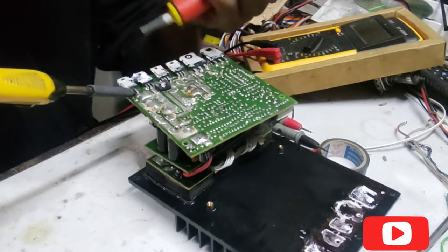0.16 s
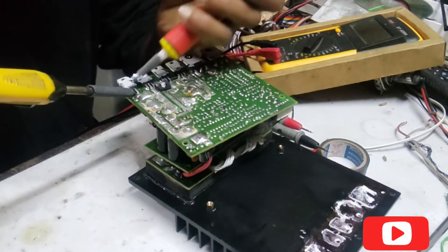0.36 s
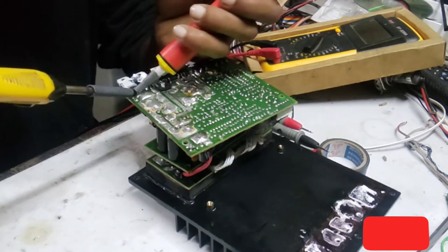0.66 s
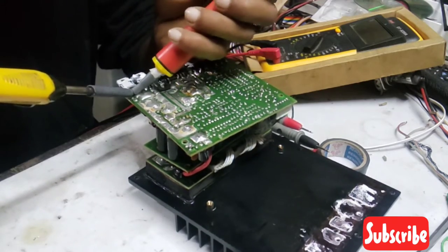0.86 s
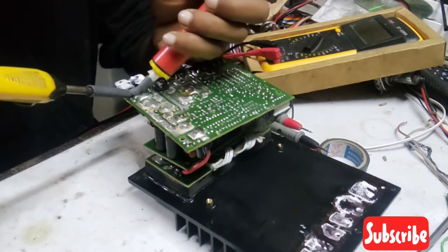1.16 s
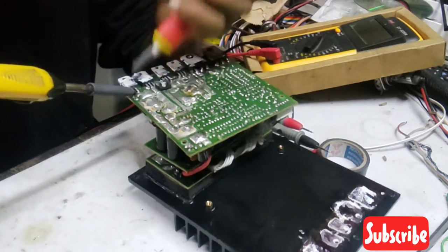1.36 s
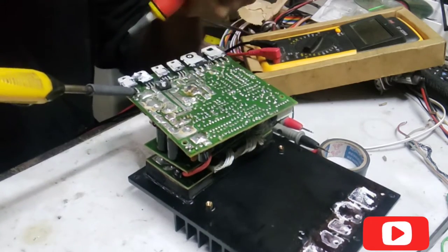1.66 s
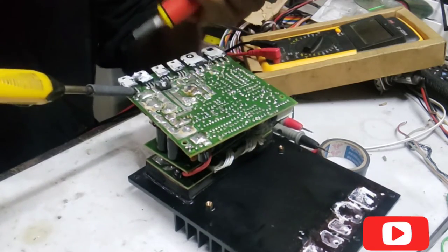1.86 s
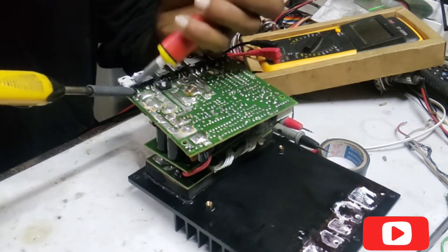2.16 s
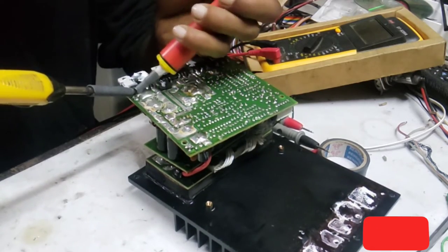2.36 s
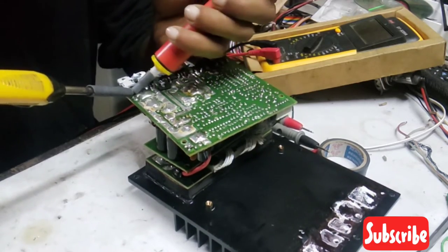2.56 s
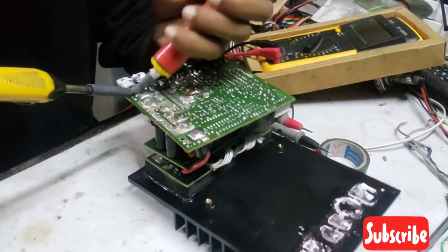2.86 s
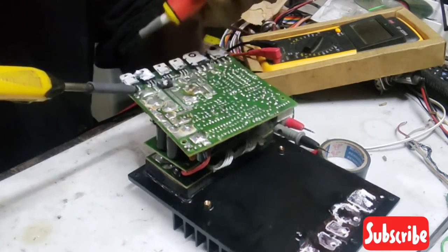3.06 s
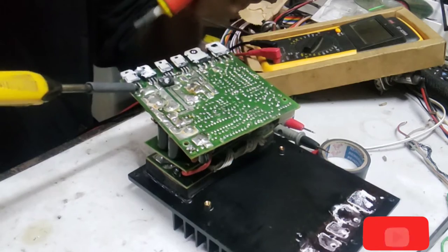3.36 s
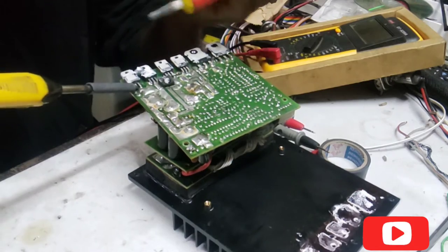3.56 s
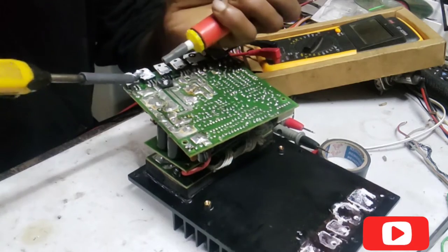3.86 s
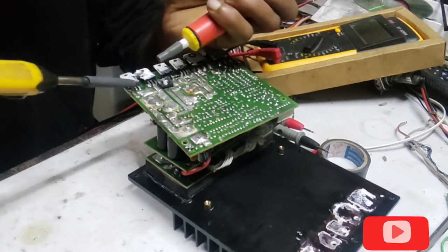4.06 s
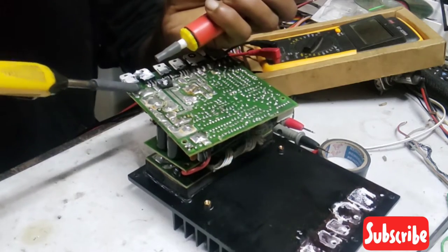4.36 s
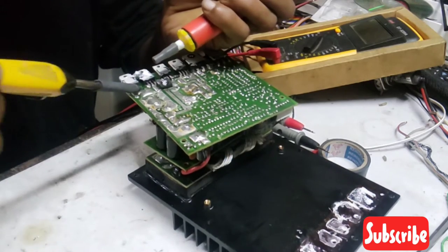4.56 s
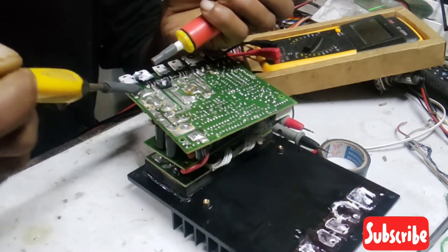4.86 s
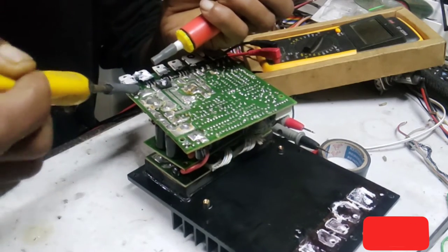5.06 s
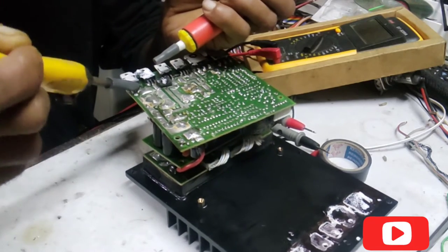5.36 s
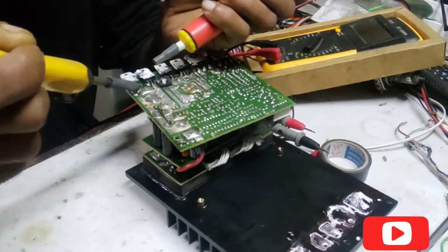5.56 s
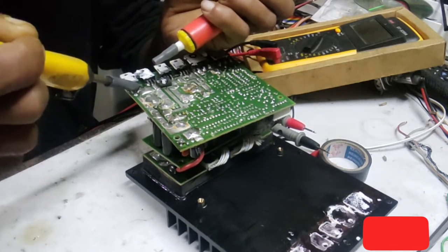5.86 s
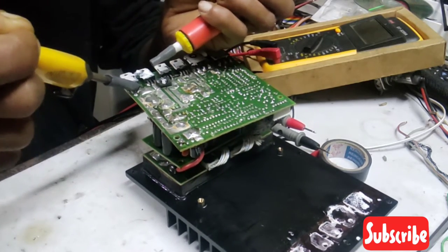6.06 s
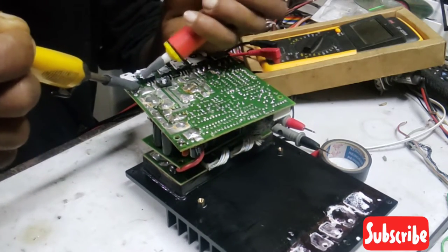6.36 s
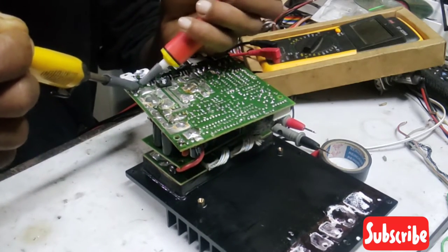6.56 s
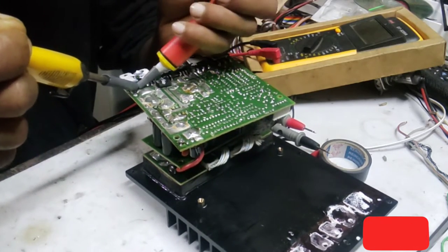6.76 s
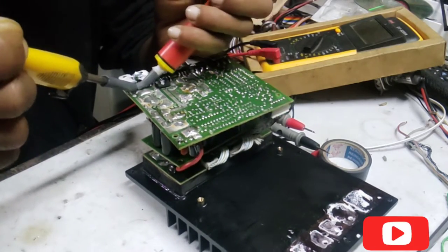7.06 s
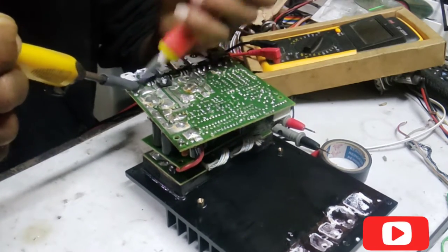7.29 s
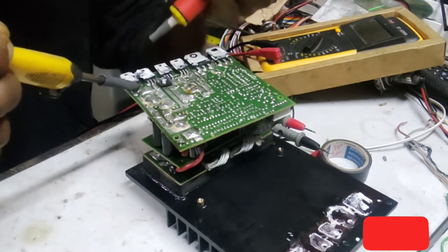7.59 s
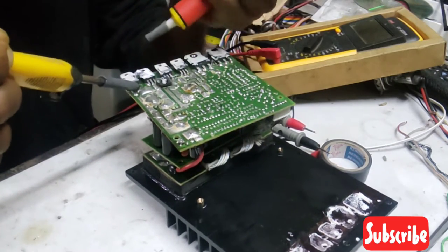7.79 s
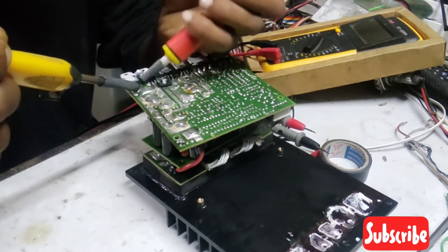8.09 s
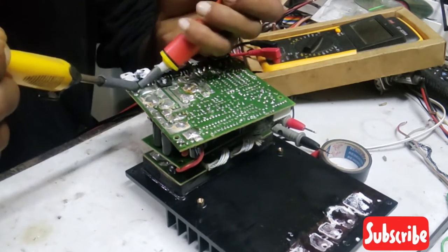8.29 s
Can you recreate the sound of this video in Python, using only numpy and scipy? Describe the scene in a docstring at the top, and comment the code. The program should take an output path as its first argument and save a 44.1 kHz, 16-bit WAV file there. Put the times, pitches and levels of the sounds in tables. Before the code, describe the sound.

A spring-loaded solder pump snaps repeatedly beside a circuit board. Each cycle begins with a hard bright latch click, then small taps; releases bring a short rush of air, a woody thud and a high ringing metal strike with spring chatter. Busy tool taps and a faint rub fill the middle. Heard very near on a phone, with a short small-room echo and a low hiss and hum.

```python
"""A steady hiss over mains hum comes first; then a spring solder pump works on a circuit board, close to a phone.
The latch clicks (a burst of noise with one sharp click) and the thumb lets the plunger settle. Tools tap, tick
and rub the board (shaped noise), which thuds (short low sines). On release air rushes in (noise that swells and
fades) and the piston clangs the metal barrel (ringing sines, spring chatter). A small room answers with an echo."""
import sys
import numpy as np
from scipy import signal
from scipy.fft import rfft, irfft, next_fast_len
from scipy.io import wavfile
from scipy.ndimage import uniform_filter1d

SR = 44100
rng = np.random.default_rng(int(sys.argv[2]) if len(sys.argv) > 2 else 0)


def generate_wav(signal):
    """Clip the signal to [-1, 1] and save it as 16-bit WAV at the path in sys.argv[1]."""
    frames = np.transpose(np.atleast_2d(signal))
    scaled = np.clip(frames, -1, 1) * 32767
    pcm = np.round(scaled).astype(np.int16)
    wavfile.write(sys.argv[1], SR, pcm)


N = 371763  # length of the scene in samples

# Colours give the balance of low and high tones; noise() and click() then set the overall level.
# steady hiss, its colour: pitch_hz, level_db (per Hz)
HISS_COLOUR = [(25, -50), (87, -12), (190, -11), (400, -14.5), (600, -18.5), (1330, -22), (2200, -22.5),
               (2800, -19.5), (3600, -26.5), (6050, -30.5), (9500, -42.5), (11500, -30.5), (13500, -30.5),
               (16000, -34)]
HISS_DB = -58.5
# mains harmonics: pitch_hz, level_db (peak of the sine)
HUM_TONES = [(199.2, -69), (398.4, -62.5), (597.5, -75)]
# how alike left and right are, for spread-out sounds: pitch_hz, likeness (0-1)
FAR_LIKENESS = [(100, 0.22), (400, 0.29), (800, 0), (2500, 0.05), (8000, 0), (11000, 0)]
# how alike left and right are, for contacts, rumble and echo: pitch_hz, likeness (0-1)
NEAR_LIKENESS = [(300, 0.85), (700, 0.5), (1500, 0.07), (12000, 0.3)]
# the latch clicks as the plunger is cocked: start_s, level_db
LATCH_CLICKS = [(0.0438, -11), (1.794, -11.5), (3.3908, -10.5), (7.8194, -13)]
# colour of the latch: pitch_hz, level_db (per Hz)
LATCH_COLOUR = [(350, -53.5), (600, -15), (957, -27.5), (1130, -28.5), (1570, -14.5), (1980, -17),
                (2990, 1), (3500, 6), (4980, 0.5), (6920, -12.5), (11800, -1.5), (14900, -1), (16000, -39)]
LATCH_THUD_DB, LATCH_THUD_HZ = -27.5, 160  # thud level is relative to the click
# low modes (natural tones) of board and bench: pitch_hz, level_db, ring_s (time to fall 60 dB)
BOARD_MODES = [(111.3, -8.5, 0.064), (143.7, -5, 0.17), (189.4, -1.5, 0.12), (235.6, -3.5, 0.087),
               (292.4, 0, 0.079), (342, -2.5, 0.056), (473, -1, 0.085), (593, -18.5, 0.2),
               (900, -17, 0.049)]
# a moment later the thumb lets the plunger settle: start_s, level_db
SETTLES = [(0.141, -31.5), (1.907, -33), (3.51, -32.5), (7.931, -36)]
# colour of the settling: pitch_hz, level_db (per Hz)
SETTLE_COLOUR = [(290, -16.5), (500, 1), (1060, -15), (1980, -8.5), (2850, -21), (3980, -13), (4600, -16),
                 (5470, -16.5), (8700, -20.5), (12100, -4.5), (16000, -34.5)]
SETTLE_THUD_DB, SETTLE_THUD_HZ = -8.5, 536  # thud level is relative to the contact
# tools tap the board: start_s, crack_db, thud_db, thud_centre_hz, knock_hz
TAPS = [(0.1506, -46.5, -59, 258, 2600), (1.1459, -48.5, -39, 146, 1110), (1.2773, -55, -47, 423, 1590),
        (1.293, -45, -30.5, 139, 2200), (1.4552, -50, -39, 182, 1590), (1.5214, -47.5, -44, 195, 4730),
        (1.621, -43, -58, 394, 5470), (2.7683, -47.5, -43, 167, 3900), (2.7846, -40.5, -61, 121, 2070),
        (2.8884, -58, -33, 124, 1580), (2.9068, -38, -30.5, 164, 4980), (3.243, -40.5, -62, 201, 1590),
        (3.706, -43.5, -33, 131, 2850), (4.339, -57, -35.5, 245, 1010), (4.3864, -49.5, -45.5, 188, 980),
        (4.6015, -45, -46, 506, 2010), (4.6419, -35.5, -33, 475, 2050), (4.7769, -49, -41, 368, 1950),
        (4.8208, -42, -38.5, 252, 2310), (4.8922, -49.5, -33, 172, 790), (4.9855, -52, -44, 157, 2120),
        (5.155, -61.5, -41.5, 212, 2480), (5.215, -60, -43, 239, 2800), (5.678, -64, -46, 370, 845),
        (5.9397, -52, -47, 482, 2090), (6.8962, -46.5, -33.5, 305, 944), (6.9059, -49.5, -33, 320, 2140),
        (7.106, -35.5, -36.5, 134, 2180), (7.262, -50.5, -39, 142, 1670), (7.2776, -45, -49, 199, 2100),
        (7.234, -57, -44.5, 250, 2800), (7.6549, -46, -48, 144, 2860), (7.6907, -46, -47, 203, 1130)]
# colour of taps and strikes: pitch_hz, level_db (per Hz)
TAP_COLOUR = [(300, -22.5), (600, -5), (1000, -7), (2200, -6), (4000, -10), (5500, -4), (8000, -11),
              (12000, -9), (15300, -16), (16000, -23.5)]
TAP_TREBLE_DB = -10.5
# faint bright ticks with no thud: start_s, level_db
TICKS = [(0.2965, -50.5), (0.3502, -55.5), (0.411, -52), (0.5167, -51.5), (0.5378, -52), (5.392, -57),
         (7.9866, -47), (8.0724, -54.5), (8.322, -54.5)]
TICK_TREBLE_DB, TICK_KNOCK_HZ = 5.5, 2770
# the plunger is let go and air rushes in: start_s, crack_db, thud_db, thud_centre_hz,
# air_swell_s, air_peak_db, air_hold_db, air_hold_s
RELEASES = [(1.063, -33.5, -24, 496, 0.019, -25.5, -51.5, 0.085),
            (2.697, -32.5, -26.5, 115.4, 0.059, -34, -45.5, 0.058),
            (7.0487, -31.5, -22.5, 123, 0.058, -28, -44, 0.049)]
# colour of the rushing air: pitch_hz, level_db (per Hz)
AIR_COLOUR = [(410, -1), (700, 0.5), (798, -4), (1600, -7.5), (1800, -35.5), (2020, -5.5), (3500, -2.5),
              (8990, -11.5), (14600, -2), (16000, -9.5)]
RELEASE_TREBLE_DB, RELEASE_KNOCK_HZ = 0.5, 3910
AIR_LAG_S, AIR_DROP_S, AIR_FADE_S = .004, 0.01, 0.015
AIR_SWELL_DB, AIR_FADE_DB = 51.5, 27.5  # how far the air climbs to its peak, and falls at the end
# piston and spring strike the metal: start_s, crack_db, thud_db, thud_centre_hz, hardness_db (as treble),
# knock_hz, barrel_ring_db, rod_ring_db, tip_ring_db, ring_length (0-1, shortens the ring)
CLANGS = [(1.3175, -23.5, -23, 126, -1, 3370, -17, -25, -54, 0.46),
          (1.3723, -36, -37, 210, -1, 2900, -34, -47, -28, 1),
          (1.476, -40, -38, 190, -4.5, 1590, -45, -42.5, -65, 1),
          (2.9161, -20, -26.5, 190, -2, 1850, -20.5, -19, -52, 0.98),
          (2.9978, -19.5, -30, 190, 2, 4400, -12.5, -13.5, -33, 0.87),
          (3.0814, -35, -36.5, 151, -21, 2590, -25.5, -24, -26.5, 0.17),
          (3.1357, -37, -56, 156, 3, 4270, -34.5, -30, -64, 0.35),
          (3.1888, -30, -63, 584, 4, 3800, -50, -45, -47, 1),
          (3.7401, -30.5, -34, 185, -10.5, 3480, -17.5, -22, -18, 1),
          (7.2815, -18, -9.5, 200, -0.5, 2060, -26, -17.5, -55, 0.59),
          (7.4076, -38, -49, 113, -5, 2300, -48, -44, -71, 0.9)]
# modes of the struck metal: pitch_hz
METAL_HZ = [4910, 5012, 5084, 5405, 5657, 6378, 6593, 6652, 7985, 9786, 9847, 10600, 12056, 12113, 14845]
# the same modes: level_db, ring_s (time to fall 60 dB at full ring_length)
METAL_MODES = [(-12, 0.5), (-17, 0.2636), (-10.5, 0.64), (-11, 0.073), (-7, 0.34), (-7.5, 0.11),
               (-18, 0.46), (-13.5, 0.57), (-27, 0.67), (-24.5, 0.58), (-28, 0.62), (2.5, 0.098), (-29, 1),
               (-11.5, 0.33), (-2, 0.053)]
# the same modes: which part rings (barrel 0, rod 1, tip 2)
METAL_PART = [0, 0, 1, 0, 0, 1, 1, 1, 0, 0, 0, 2, 1, 1, 0]
# the hand closes on the barrel: start_s
GRIP_S = [1.62, 3.19, 4.2, 7.41]
# a harder strike also reaches the high modes: dB per octave above the knee, for each dB of hardness
REACH_PER_OCTAVE, REACH_KNEE_HZ = 4.3, 7660
# colour of the spring's chatter: pitch_hz, level_db (per Hz)
RATTLE_COLOUR = [(500, -6.5), (1000, -12.0), (3000, -4.0), (5000, -5.0), (8000, -17.5)]
RATTLE_DB = -10  # relative to the crack
# the iron rubs along the board: start_s, level_db, rumble_db
RUBS = [(4.4, -65, -62), (4.55, -49, -60.5), (4.668, -52.5, -43), (4.78, -62.5, -64)]
# colour of the rub: pitch_hz, level_db (per Hz)
RUB_COLOUR = [(350, -17), (600, 1.5), (1070, -12), (1310, 0.5), (1550, -7), (2090, 0.5), (2500, -5),
              (3590, -2.5), (4990, -17), (9000, -22.5), (11700, -28), (19800, -120)]
# colour of the shaken board: pitch_hz, level_db (per Hz)
RUMBLE_COLOUR = [(40, -46), (90, -17), (200, 1), (450, 3.5), (800, -10.5), (1600, -32)]
# how long the room rings: pitch_hz, ring_s (time to fall 60 dB)
ROOM_T60 = [(200, 0.32), (1000, 0.18), (4000, 0.16), (12000, .16)]
ROOM_DB = -6
# the phone's two microphone ports: pitch_hz, left_minus_right_db
PORT_DB = [(200, 1), (1500, 0), (4000, -0.5), (8000, -2.5), (12000, 12), (15000, 0.5)]
PORT_LAG_S = .00007  # the right port hears the bench this much later
TOP_HZ = 15700  # the phone passes little above this


def undb(db):
    """Turn a level in dB into a gain."""
    return 10 ** (np.asarray(db) / 20)


def along(table, hz):
    """Read between the (pitch, value) points of a table, on a log-frequency axis."""
    f, v = np.transpose(table)
    return np.interp(np.log(np.maximum(hz, 1)), np.log(f), v)


def curve(table):
    """Turn a table's dB columns into gains along time, silent outside the table."""
    s, *columns = np.transpose(table)
    t = np.arange(N) / SR
    return [undb(np.interp(t, s, column, -200, -200)) for column in columns]


def add(out, x, s):
    """Mix a sound in at s seconds."""
    i = int(s * SR)
    out[:, i:i + x.shape[1]] += x[:, :N - i]


def noise(colour, likeness, size):
    """Two channels of coloured noise, rms 1; part is shared, part is each channel's own."""
    n = next_fast_len(size)
    hz = np.fft.rfftfreq(n, 1 / SR)
    alike = np.clip(along(likeness, hz), 0, 1)
    mid, side = rfft(rng.standard_normal((2, n))) * np.sqrt([1 + alike, 1 - alike])
    left_right = mid + side * np.array([[1], [-1]])
    x = irfft(left_right * undb(along(colour, hz)), n)[:, :size]
    return x / x.std()


def flutter(shape, hold):
    """Random levels held for `hold` samples, with smooth slides between them; spread near 1."""
    rows, size = shape
    steps = np.repeat(rng.standard_normal((rows, size // hold + 1)), hold, axis=1)
    return 1.2 * uniform_filter1d(steps, size=hold)[:, :size]


def click(colour, size):
    """One sharp click, peak 1: a spectrum with its energy packed at the start (minimum phase)."""
    log_spectrum = np.log(undb(along(colour, np.fft.rfftfreq(size, 1 / SR))))
    cepstrum = irfft(log_spectrum, size)
    # fold the second half onto the first, so nothing sounds before the click
    cepstrum[1:size // 2] *= 2
    cepstrum[size // 2 + 1:] = 0
    x = irfft(np.exp(rfft(cepstrum)), size)
    return x / np.abs(x).max()


def crack(colour, rise_s, fall_s, click_db, treble_db=0, knock_hz=3500, knock_db=0):
    """A contact: a scrape swells to one sharp click and dies; a narrow knock colours both."""
    hz = np.geomspace(300, 16000, 80)
    knock = knock_db * np.exp(-(np.log2(hz / knock_hz) / 0.21) ** 2)
    db = along(colour, hz) + treble_db * (hz > 5000) + knock
    colour = list(zip(hz, db))
    lead = int(.006 * SR)  # samples before the click
    t = (np.arange(2048) - lead) / SR
    swell = np.exp(np.minimum(t / rise_s, -t / fall_s))
    scrape = noise(colour, NEAR_LIKENESS, len(t)) * swell
    snap = undb(click_db) * click(colour, len(t))
    return scrape + [np.roll(snap, lead), np.roll(snap, lead + int(PORT_LAG_S * SR))]


def ring(hz, db, t60, scatter_db, detune, rise_s, size, rough_db=1.7):
    """One blow on a body: sines swell and decay unevenly, each blow a little different."""
    chance, t = rng.standard_normal((2, len(hz), 1)), np.arange(size) / SR
    # loose parts touch the body as it rings, so each mode wavers
    db = db[:, None] + scatter_db * chance[0] + rough_db * flutter((len(hz), size), 400)
    gain = undb(db - 60 * t / t60[:, None]) * (1 - np.exp(-t / rise_s))
    turn = 2 * np.pi * hz[:, None] * (1 + detune * chance[1])
    # round the phone's body tones reach the far port late, by a quarter cycle at most
    late = np.minimum(turn * PORT_LAG_S, np.pi / 2)
    return np.array([(gain * np.sin(turn * t - lag)).sum(0) for lag in (0, late)])


def thud(db, centre_hz, rise_s, spread_db=7.0):
    """The board and bench ring low; the place struck favours the modes near centre_hz."""
    hz, mode_db, t60 = np.transpose(BOARD_MODES)
    # modes lose spread_db for each octave away from the centre
    favoured_db = db + mode_db - spread_db * np.abs(np.log2(hz / centre_hz))
    return ring(hz, favoured_db, t60, 2.3, 0.04, rise_s, size=9000)


def background():
    """Steady hiss, which is coloured noise, over mains hum, which is plain sines."""
    t = np.arange(N) / SR
    hum = sum(undb(db) * np.sin(2 * np.pi * hz * t) for hz, db in HUM_TONES)
    return undb(HISS_DB) * noise(HISS_COLOUR, FAR_LIKENESS, N) + hum


# The contact functions below start each crack 5 ms early, because its click comes 6 ms in.
def latch_clicks(pump, board):
    """The latch snaps as the plunger is cocked: a very short crack and a quick thud."""
    for s, db in LATCH_CLICKS:
        add(pump, undb(db) * crack(LATCH_COLOUR, .0011, .0013, 12.), s - .005)
        add(board, thud(db + LATCH_THUD_DB, LATCH_THUD_HZ, 0.00082), s)


def room():
    """Echo of a small room for each port: noise that dies at its own speed in each octave band."""
    t, out = np.arange(int(.3 * SR)) / SR, 0
    for hz in 125 * 2. ** np.arange(8):
        edges = [hz / 2 ** .5, min(hz * 2 ** .5, .45 * SR)]
        band = signal.butter(2, edges, "band", fs=SR, output="sos")
        burst = noise([(20, 0), (20000, 0)], NEAR_LIKENESS, len(t))
        out = out + signal.sosfilt(band, burst) * undb(-60 * t / along(ROOM_T60, hz))
    out = out * (1 - np.exp(-t / 0.0046)) ** 2  # the echo builds up gradually
    return undb(ROOM_DB) * out / np.sqrt((out ** 2).sum(1, keepdims=True))


def plunger_settles(tools, board):
    """The thumb lets the plunger settle: a soft crack and a thud."""
    for s, db in SETTLES:
        add(tools, undb(db) * crack(SETTLE_COLOUR, 0.00144, 0.0044, 11.3), s - .005)
        add(board, thud(db + SETTLE_THUD_DB, SETTLE_THUD_HZ, 0.00047), s)


def tap(db, treble_db, knock_hz):
    """A hard little contact: a crack with a strong knock at one pitch."""
    return undb(db) * crack(TAP_COLOUR, 0.0024, 0.0074, 9.7, treble_db, knock_hz, 10.4)


def tool_taps(tools, board):
    """Tools tap the board, so each contact sets off the board's low modes."""
    for s, db, thud_db, thud_hz, knock_hz in TAPS:
        add(tools, tap(db, TAP_TREBLE_DB, knock_hz), s - .005)
        add(board, thud(thud_db, thud_hz, 0.0021), s - .002)


def bright_ticks(tools):
    """Faint contacts with raised treble and no thud."""
    for s, db in TICKS:
        add(tools, tap(db, TICK_TREBLE_DB, TICK_KNOCK_HZ), s - .005)


def suction():
    """Air hisses into the nozzle: noise swells to a puff, drops to a steady draw and fades."""
    level = 0
    for s, _, _, _, swell_s, peak_db, hold_db, hold_s in RELEASES:
        s = s + AIR_LAG_S
        puff = [(s - swell_s, peak_db - AIR_SWELL_DB),
                (s, peak_db),
                (s + AIR_DROP_S, hold_db),
                (s + hold_s, hold_db),
                (s + hold_s + AIR_FADE_S, hold_db - AIR_FADE_DB)]
        level = level + curve(puff)[0]
    return level * noise(AIR_COLOUR, FAR_LIKENESS, N)


def release_knocks(tools, board):
    """The plunger is let go: a tap-like crack and a thud of the board."""
    for s, db, thud_db, thud_hz, *_ in RELEASES:
        add(tools, tap(db, RELEASE_TREBLE_DB, RELEASE_KNOCK_HZ), s - .005)
        add(board, thud(thud_db, thud_hz, 0.0043), s - .002)


def rattle(t60):
    """The spring chatters in the barrel after a strike: grainy noise that dies away."""
    t = np.arange(9000) / SR
    chatter = noise(RATTLE_COLOUR, NEAR_LIKENESS, len(t))
    return chatter * undb(5.5 * flutter((1, len(t)), 100) - 60 * t / t60)


def clangs(tools, board, barrel):
    """Piston and spring strike the metal, whose high modes ring until the hand grips the barrel."""
    hz, (mode_db, t60) = np.array(METAL_HZ), np.transpose(METAL_MODES)
    t = np.arange(22000) / SR
    octaves = np.maximum(np.log2(hz / REACH_KNEE_HZ), 0)
    for s, db, thud_db, thud_hz, hard_db, knock_hz, *part_db, length in CLANGS:
        add(tools, undb(db) * crack(TAP_COLOUR, 0.0015, 0.0059, 1.6, hard_db, knock_hz, 8.3), s - .005)
        add(tools, undb(db + RATTLE_DB) * rattle(0.14), s)
        ring_db = mode_db + np.take(part_db, METAL_PART) + REACH_PER_OCTAVE * hard_db * octaves
        # the next grip chokes the ring by 300 dB per second
        grip_s = min([g for g in GRIP_S if g > s + .02] + [s + 1]) - s
        choke = undb(-300 * np.maximum(t - grip_s, 0))
        add(barrel, choke * ring(hz, ring_db, t60 * length, 1.0, 0.000094, 0.0014, len(t)), s)
        add(board, thud(thud_db, thud_hz, 0.0042, spread_db=15.0), s)


def iron_rub():
    """The iron rubs a little unevenly along the board and shakes it: grainy noise over low noise."""
    rub, rumble = curve(RUBS)
    steps = np.repeat(rng.standard_normal(N // 128 + 1), 128)
    grains = undb(2.5 * uniform_filter1d(steps, size=64)[:N])
    shake = noise(RUMBLE_COLOUR, NEAR_LIKENESS, N)
    return rub * grains * noise(RUB_COLOUR, FAR_LIKENESS, N) + rumble * shake


def scene():
    """Direct sound, its echo and the background, all coloured by each microphone port."""
    pump, tools, board, barrel = np.zeros((4, 2, N))
    latch_clicks(pump, board)
    plunger_settles(tools, board)
    tool_taps(tools, board)
    bright_ticks(tools)
    release_knocks(tools, board)
    clangs(tools, board, barrel)
    pump = pump + suction() + iron_rub()
    # a small board radiates little deep bass
    board = signal.sosfilt(signal.butter(5, 68, "high", fs=SR, output="sos"), board)
    # the board lies close to the phone, so its sounds carry less room
    wet = pump + undb(-1.0) * tools + undb(-7) * board + undb(-8) * barrel
    echo = signal.fftconvolve(wet, room(), axes=1)[:, :N]
    mix = pump + tools + board + barrel + echo + background()
    # each port takes half of the left-right difference
    n = next_fast_len(N)
    lean_db = along(PORT_DB, np.fft.rfftfreq(n, 1 / SR)) / 2
    return irfft(rfft(mix, n) * undb([lean_db, -lean_db]), n)[:, :N]


def record(dry):
    """The phone rounds the loudest peaks and cuts the top."""
    rounded = .72 * np.tanh(dry / .72)
    return signal.sosfilt(signal.ellip(6, .3, 60, TOP_HZ, fs=SR, output="sos"), rounded)


dry = scene()
out = record(dry)
generate_wav(out)
```